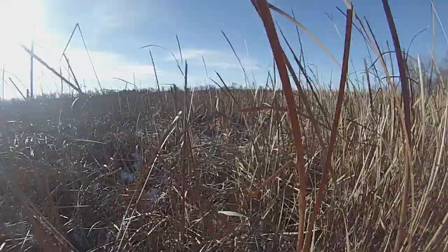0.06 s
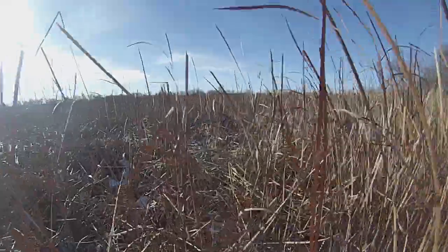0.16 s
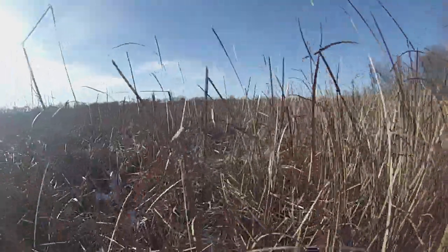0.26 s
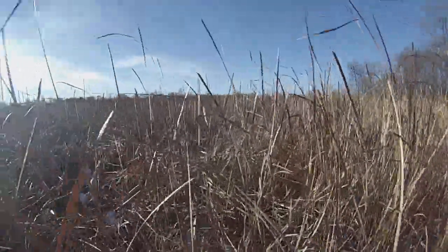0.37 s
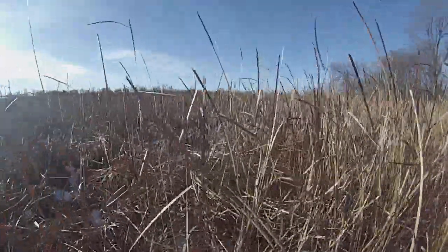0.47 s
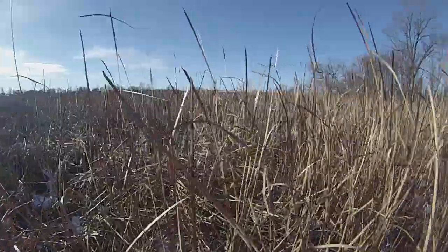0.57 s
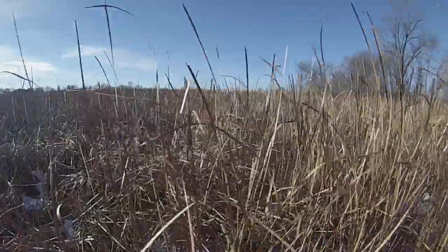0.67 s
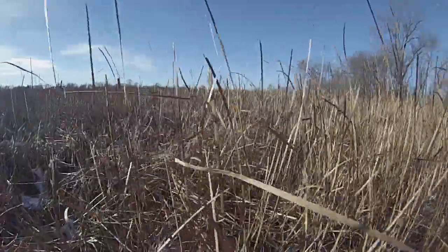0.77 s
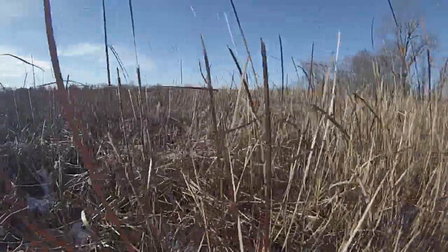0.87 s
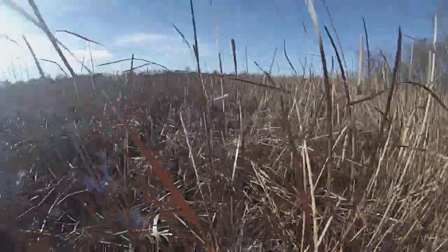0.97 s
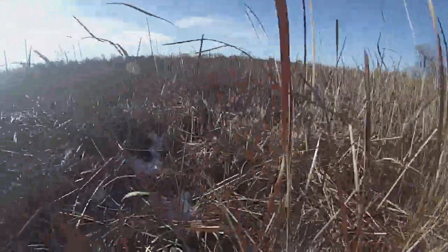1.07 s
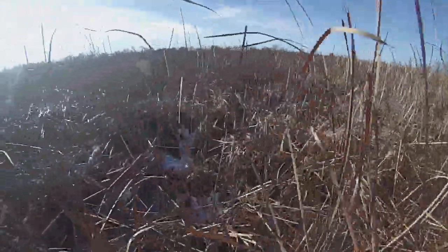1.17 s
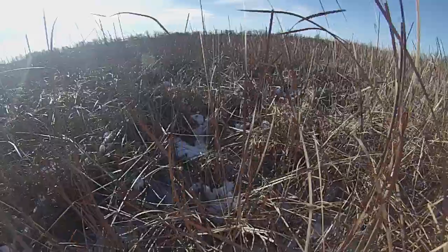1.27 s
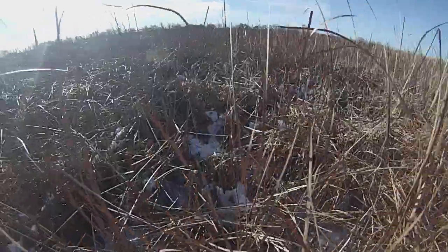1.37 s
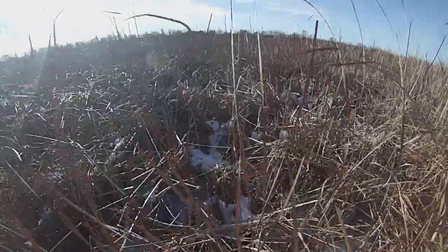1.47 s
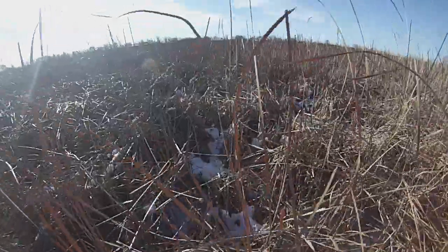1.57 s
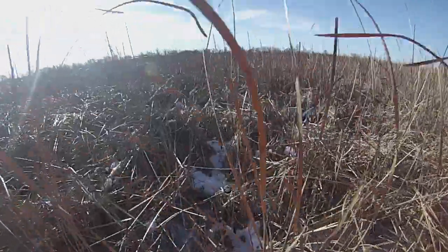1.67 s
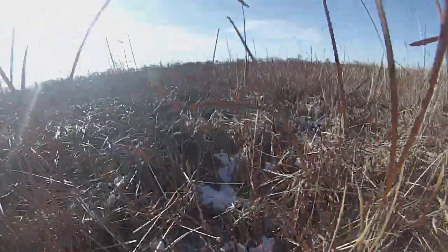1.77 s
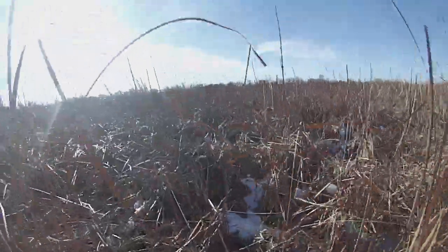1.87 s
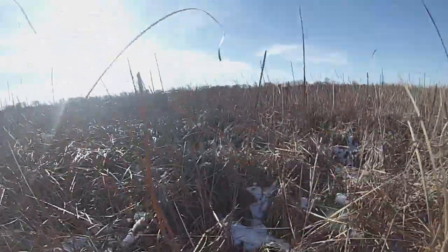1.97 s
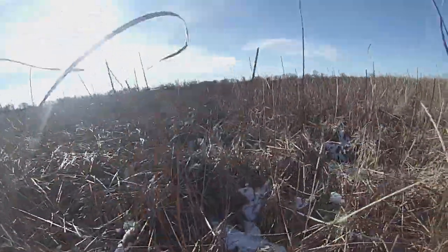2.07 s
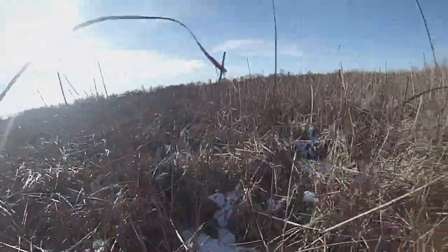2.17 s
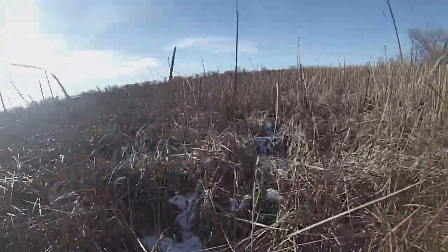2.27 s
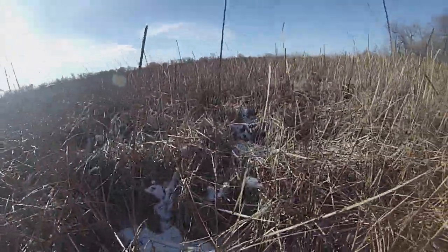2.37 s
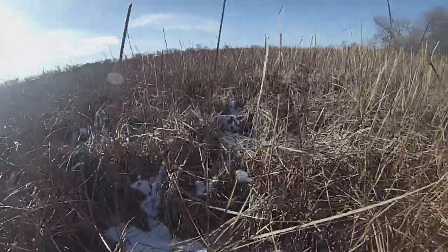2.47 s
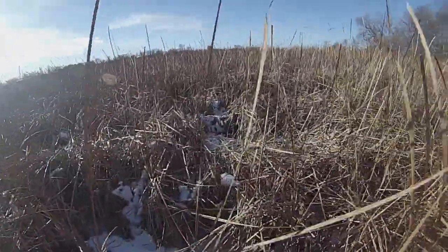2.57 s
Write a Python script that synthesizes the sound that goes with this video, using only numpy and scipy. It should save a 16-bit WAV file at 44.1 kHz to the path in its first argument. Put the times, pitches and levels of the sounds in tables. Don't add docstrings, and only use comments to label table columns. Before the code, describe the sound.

Dry reed stalks rustle and scrape against a small camera, with one very hard snap midway

```python
import sys
import numpy as np
from scipy import signal
from scipy.io import wavfile
from scipy.ndimage import uniform_filter1d, minimum_filter1d

SR = 44100
rng = np.random.default_rng(int(sys.argv[2]) if len(sys.argv) > 2 else 0)


def wav_record(signal):
    frames = np.transpose(np.atleast_2d(signal))
    bounded = np.clip(frames, -1, 1)
    quanta = np.round(bounded * 32767).astype(np.int16)
    wavfile.write(sys.argv[1], SR, quanta)


def ratio(d):
    e = np.asarray(d, float) / 20
    return 10 ** e


N = 114660


def rms_one(x):
    return x / np.sqrt(np.mean(x ** 2) + 1e-20)


def in_time(rows):
    return np.interp(np.arange(N) / SR, *np.transpose(rows))


def drift(rate_hz):
    r = np.exp(-80 * np.pi * rate_hz / SR)
    slow = signal.lfilter([1], [1, -2 * r, r * r], rng.standard_normal(N // 40 + 2002))[2000:]
    return np.interp(np.arange(N) / 40, np.arange(len(slow)), rms_one(slow))


def butter(x, order, hz, kind="low"):
    return signal.sosfilt(signal.butter(order, hz, kind, fs=SR, output="sos"), x)


def ring(clicks, hz, t60):
    r = ratio(-60 / (t60 * SR))
    w = 2 * np.pi * hz / SR
    return signal.lfilter([0, np.sin(w)], [1, -2 * r * np.cos(w), r * r], clicks + 1e-18)


def grains(per_s, spread_db):
    sizes = ratio(spread_db * np.minimum(rng.exponential(1, N), 5))
    sizes = sizes * rng.choice([-1, 1], N)
    return rms_one(sizes * (rng.random(N) < per_s / SR))


# (frequency [Hz], width [Hz], lift [dB])
CAVITIES = [(1590, 200, 8), (2440, 670, 4), (3250, 330, 7), (5400, 650, 10), (6600, 400, 2), (8050, 600, 7)]


def housing(x):
    for hz, width, lift_db in CAVITIES:
        r = np.exp(-np.pi * width / SR)
        poles = [1, -2 * r * np.cos(2 * np.pi * hz / SR), r * r]
        peak = signal.lfilter([1, 0, -1], poles, x) * (1 - r * r) / 2
        x = x + (ratio(lift_db) - 1) * peak
    return x


# (time [s], level [dB])
RUSTLE = [(0, -57), (.3, -58), (.5, -57.5), (.62, -58.5), (.8, -54.5), (1.0, -54), (1.14, -58.5),
          (1.3, -53), (1.5, -52.5), (1.6, -51.5), (1.8, -54.5), (2.0, -56), (2.2, -54), (2.4, -54),
          (2.6, -54)]
# (frequency [Hz], density [dB per Hz])
RUSTLE_TILT = [(150, -2), (400, -2), (1100, -6.5), (2000, -3), (4300, -12), (8000, -12), (12500, -11),
               (15000, -22)]


def rustle():
    crackle_share = 0.34
    together = drift(30)
    crackle = grains(2800 * ratio(4.3 * drift(25)), -0.5)
    hiss = rng.standard_normal((2, N))
    white = np.sqrt(1 - crackle_share) * hiss + np.sqrt(crackle_share) * crackle
    hz_at, db_at = np.transpose(RUSTLE_TILT)
    edges = 90 * 2 ** np.arange(0, 7.7, .5)
    out = 0
    for k, (low, high) in enumerate(zip(edges, edges[1:])):
        band = butter(white[k % 2], 2, [low, high], "band")
        tilt_db = np.interp(np.log(low * high) / 2, np.log(hz_at), db_at)
        out = out + band * ratio(tilt_db + 0.64 * together + 1.8 * drift(25))
    return ratio(in_time(RUSTLE)) * rms_one(housing(out))


# (time [s], level [dB])
DRAG = [
    (0, -43),
    (.08, -46),
    (.17, -46),
    (.215, -51),
    (.235, -43),
    (.25, -27),
    (.259, -34.5),
    (.275, -37),
    (.3, -59.5),
    (.33, -68),
]
# (frequency [Hz], struck on side [dB], struck on front [dB], t60 [s])
SHELL = [(540, -25, -45, 0.0091), (850, -22, -36, 0.015), (1720, -3.5, -9, 0.019), (2540, -3, -4, 0.0086),
         (3057, -11.5, 0, 0.015), (3330, -5, -4, 0.0074), (4100, -21, -22, .01), (4650, -30, -4, 0.0078),
         (5500, -26, -3, 0.005), (6560, -30, -10, 0.0048), (7700, -38, -7, 0.004),
         (8530, -37.5, -11, 0.0044), (11040, -25.5, -2, 0.002), (13100, -45, -13, 0.003)]
DRAG_GRIP = [-7, -5.5, -6, -3.5, -8, -8, -17, -25, -16.5]


def drag():
    slips = grains(2200 * ratio(3.5 * drift(65)), -0.5)
    body = 0
    for k, ((hz, _, _, t60), db) in enumerate(zip(SHELL, DRAG_GRIP)):
        body = body + ratio(db) * (-1) ** k * ring(slips, hz, t60 * .8)
    return ratio(in_time(DRAG)) * rms_one(body)


# (time [s], peak [dB], pitch [Hz], length [swings])
JOLTS = [(.016, -42, 38, 1.5), (.162, -28, 50, .9), (.235, -38, 50, 1.1), (.270, -28, 42, 1.0),
         (.297, -29, 30, 1.1), (.343, -29, 55, .8), (1.845, -29, 42, .8), (1.880, -23, 40, 1.1),
         (1.923, -31, 36, 1.2), (1.978, -32, 24, 1.1), (2.497, -29, 48, .9), (.035, -52, 150, 3.0),
         (.258, -42, 160, 3.0), (.376, -39, 30, 1.1), (.44, -41, 26, 1.1), (.86, -45, 40, 1.1),
         (.93, -46, 70, 1.1), (1.025, -32, 42, 1.2), (1.07, -39, 32, 1.1), (1.14, -40, 30, 1.1),
         (1.1597, -12, 300, .15), (1.2, -29, 25, 1.1), (1.775, -40, 30, 1.1), (2.045, -43, 35, 1.1),
         (2.095, -44, 35, 1.1), (2.262, -40, 45, .9), (2.44, -45, 30, 1.1), (2.575, -45, 35, 1.1)]
# (time [s], level [dB])
RUMBLE = [
    (0, -56),
    (.3, -54),
    (.6, -54),
    (.9, -52),
    (1.2, -52),
    (1.4, -56),
    (1.7, -54),
    (2.1, -53),
    (2.35, -56),
    (2.6, -53),
]


def handling():
    t = np.arange(N) / SR
    rumble = rms_one(butter(rng.standard_normal(N + SR), 2, [9.2, 48.6], "band")[SR:])
    judder = rms_one(butter(rng.standard_normal(N + SR), 2, [60, 146], "band")[SR:])
    out = ratio(in_time(RUMBLE) + 2.5 * drift(4.8)) * rumble
    for s, db, hz, turns in JOLTS:
        swing = np.cos(2 * np.pi * hz * (t - s)) + ratio(-24.5) * judder
        out += ratio(db) * swing * np.exp(-2 * ((t - s) * hz / turns) ** 2)
    return out


# (frequency [Hz], struck on side [dB], struck on front [dB], t60 [s])
WINDOW = [(1863, -37, -40, .2), (2180, -21, -36, .09), (2930, -36, -30, .04), (4560, -55, -36, .048),
          (5265, -50, -30, .03), (2560, -40, -35, .05)]
# (time [s], peak [dB], place [0 side-1 front], hardness [Hz])
STRIKES = [(0.036, -38.5, 0.22, 9000), (0.071, -47, 0.97, 4000), (0.085, -31, 0.57, 9700),
           (0.197, -31, 0.012, 2537), (0.2227, -40.5, 0.012, 3000), (.2378, -21, 0.15, 9060),
           (.2392, -18, 0.12, 3920), (0.2428, -16.5, 0.063, 12000), (.2445, -16, .01, 3000),
           (.2465, -27, .01, 9060), (.2495, -18, 0.11, 12000), (.2512, -21, .01, 2460),
           (.2560, -30.5, 0.092, 6120), (.2623, -3.5, 0.022, 14950), (.2715, -27.5, .4, 11960),
           (.2735, -38, 1, 14000), (0.293, -35.5, 0.36, 9000), (.324, -58, 1, 12000),
           (0.3381, -39, .8, 12000), (.3538, -44, 0.79, 15000), (1.1593, 14.5, 1, 19000),
           (2.222, -45, .01, 885), (2.4413, -40.5, .01, 4000)]
# (time [s], peak [dB], place [0-1], hardness [Hz])
RECOILS = [
    (.26366, -6, .02, 3200),
]


def strikes():
    length, bounce, bounce_db = 8192, int(.00212 * SR), -13
    out = np.zeros(N + length)
    modes = SHELL + WINDOW
    for n, (s, db, place, hard_hz) in enumerate(STRIKES + RECOILS):
        sound = np.zeros(length)
        sound[[0, bounce]] = ratio(-16 + place * (-3 + 16)) * ratio(np.array([0, bounce_db]))
        sound = butter(sound, 1, 1500, "high")
        for k, (hz, side_db, front_db, t60) in enumerate(modes):
            first_db, second_db = rng.normal(0, 1, 2)
            click = np.zeros(length)
            click[0] = ratio(first_db)
            click[bounce] = ratio(second_db + bounce_db)
            sign = (-1) ** (k * (place < .5))
            damped_t60 = t60 * (1 - .3 * place * (k < len(SHELL)))
            level = ratio(side_db + place * (front_db - side_db))
            sound = sound + sign * level * ring(click, hz, damped_t60)
        sound = butter(sound, 2, np.clip(hard_hz, 200, 19000))
        if place > .5:
            sound = butter(sound, 2, 2200, "high")
        push = (-1) ** (n < len(STRIKES))
        start = int(s * SR)
        out[start:start + length] += push * ratio(db) * sound / np.abs(sound).max()
    return butter(out[:N] + 1e-18, 4, 13500)


# (time [s], peak [dB], pitch [Hz], t60 [s])
TICKS = [(.052, -41, 3000, 0.036), (.072, -40, 3034, 0.027), (.921, -47.5, 667, 0.039),
         (.922, -48.5, 880, .03), (1.548, -53, 895, .015), (1.558, -44, 3850, .015),
         (1.577, -46, 2010, .015), (1.576, -45, 4050, 0.024), (1.6, -44, 2600, .015),
         (1.673, -50, 5400, .012), (1.675, -49, 8100, .01), (1.783, -46, 2980, 0.022),
         (1.838, -50, 1550, 0.017), (1.949, -39, 1710, 0.032), (1.95, -46, 1250, .025),
         (1.9495, -50, 2900, .012), (2.181, -47.5, 3220, 0.032), (2.426, -52, 1970, .02),
         (2.53, -46, 2750, 0.016), (2.59, -51.5, 3020, .025)]


def ticks():
    length = 4096
    out = np.zeros(N + length)
    for s, db, hz, t60 in TICKS:
        touch = np.zeros(length)
        touch[0] = ratio(db) * 4 * np.pi / 3 * hz / SR
        start = int(s * SR)
        out[start:start + length] += ring(ring(touch, hz, 3 / hz), hz, t60)
    return out[:N]


# (time [s], level [dB], length [s])
SWISHES = [(0.086, -53, 0.046), (0.3535, -42, .01), (0.469, -52.5, 0.014), (1.038, -63, .01),
           (1.342, -50, 0.027), (1.444, -44.5, 0.008), (1.546, -48.5, 0.034), (1.689, -46, 0.0086),
           (1.836, -43.5, 0.014), (2.026, -68, 0.014), (2.114, -52, 0.0074), (2.422, -49.5, 0.018),
           (2.519, -52, 0.031)]


def swishes():
    t = np.arange(N) / SR
    shape = np.zeros(N)
    for s, db, length in SWISHES:
        rise = np.clip((t - s) / .0015, 0, 1)
        shape += ratio(db) * rise * np.exp(-np.clip(t - s, 0, 1) / length)
    bright = butter(grains(12000.0, 1.5), 1, 3680, "high")
    return shape * rms_one(housing(bright))


def scene():
    soft = rustle() + drag() + swishes()
    soft = signal.sosfilt(signal.ellip(8, .5, 60, 15250, fs=SR, output="sos"), soft)
    return (soft + handling() + strikes() + ticks())[None, :]


def band_limit(x):
    return signal.sosfilt(signal.butter(12, 16550, fs=SR, output="sos"), x)


def record(dry):
    ahead, hold = int(.016 * SR), int(.2 * SR)
    over_db = np.maximum(20 * np.log10(np.abs(dry[0]) + 1e-9), 0)
    padded = np.r_[np.zeros(hold), over_db, np.zeros(hold)]
    held = -minimum_filter1d(-padded, size=ahead + hold)
    held = held[hold + (ahead - hold) // 2:][:N]
    slope = 25 * np.arange(N) / SR
    duck_db = np.maximum.accumulate(held + slope) - slope
    duck_db = uniform_filter1d(duck_db, size=int(.0006 * SR) + 1)
    mix = dry * ratio(-duck_db)
    return band_limit(mix)


dry = scene()
out = record(dry)
wav_record(out)
```